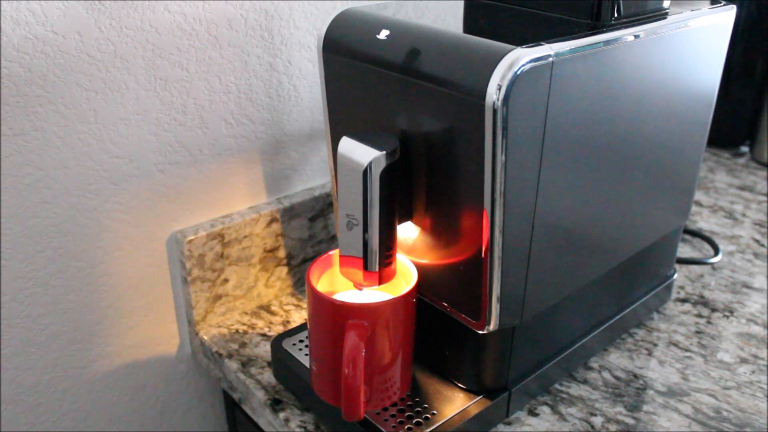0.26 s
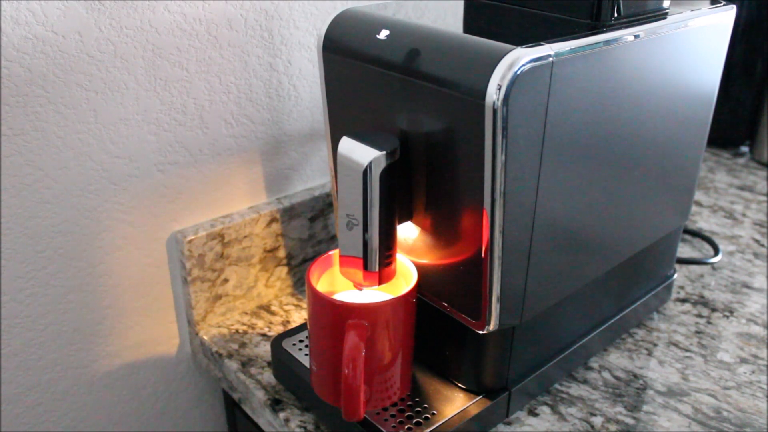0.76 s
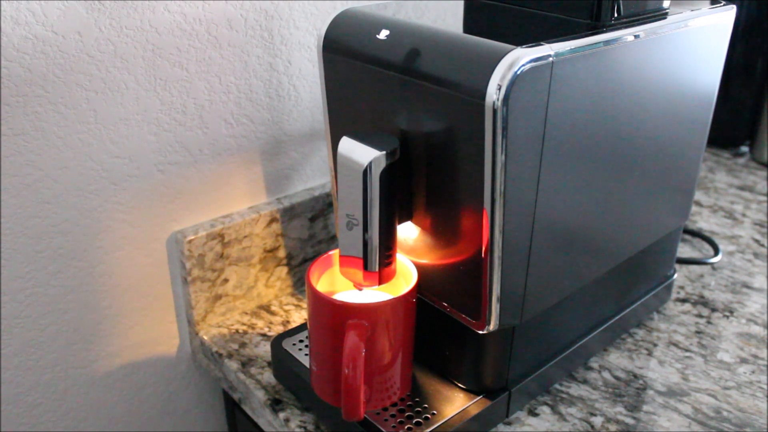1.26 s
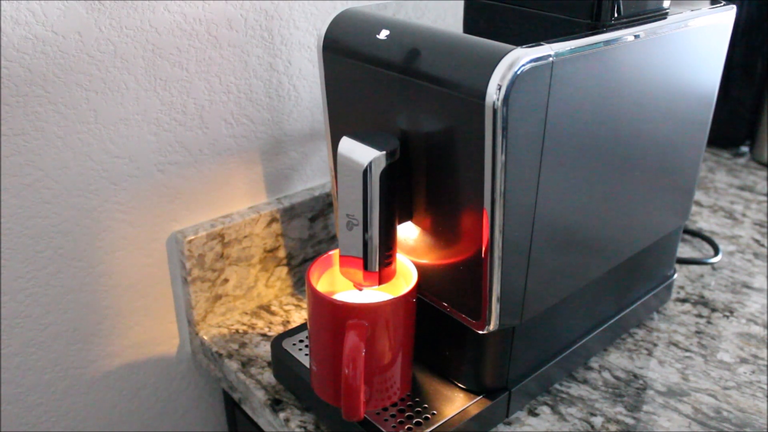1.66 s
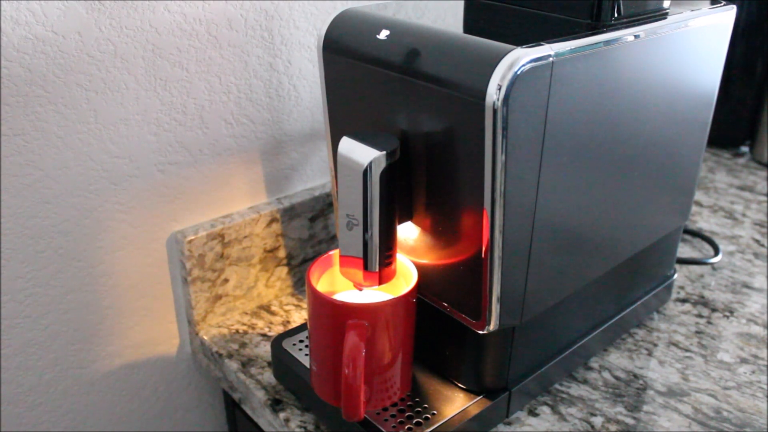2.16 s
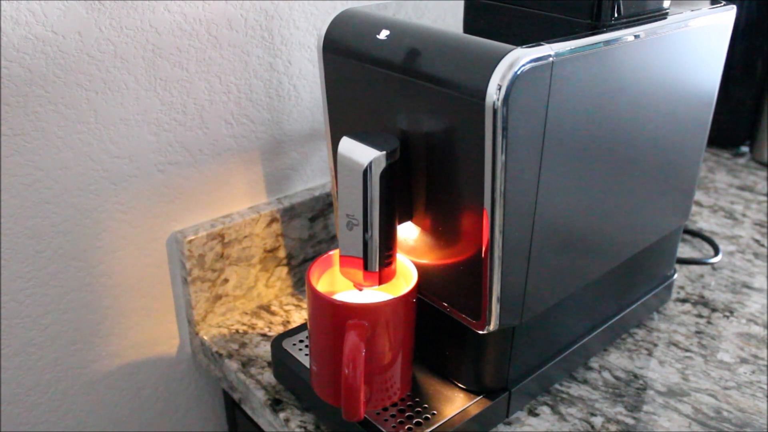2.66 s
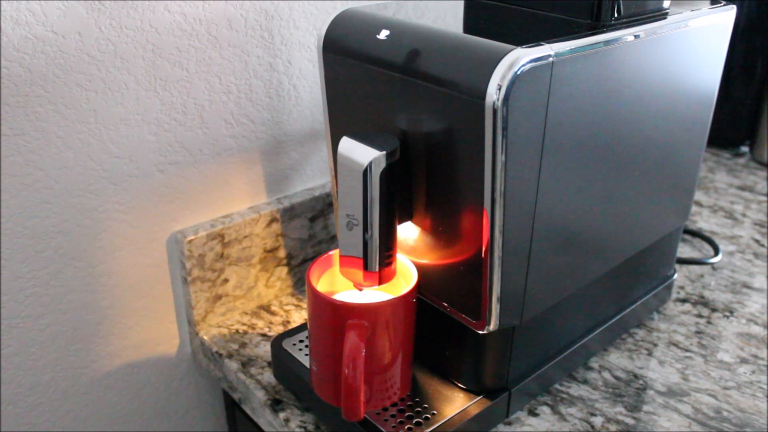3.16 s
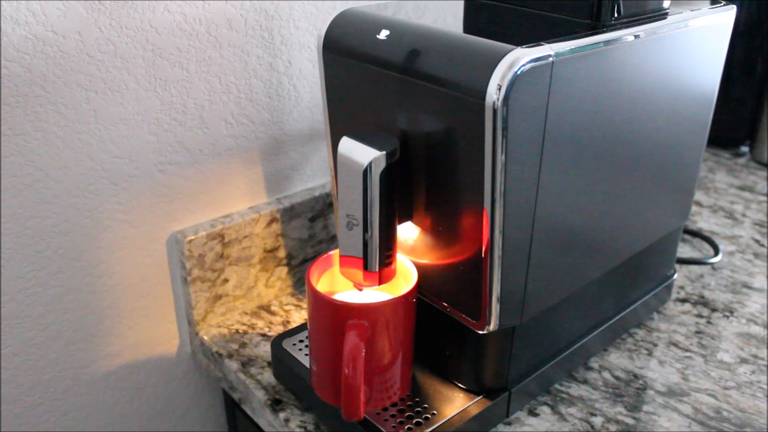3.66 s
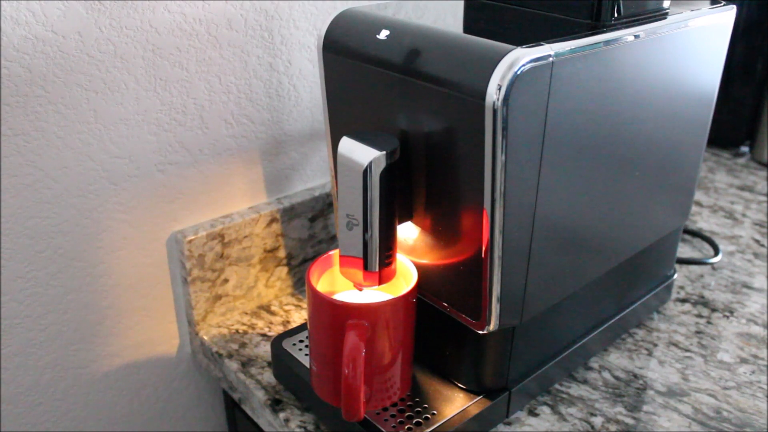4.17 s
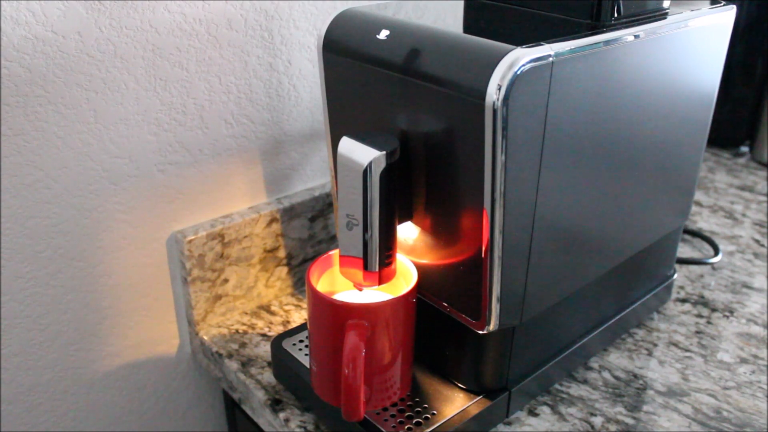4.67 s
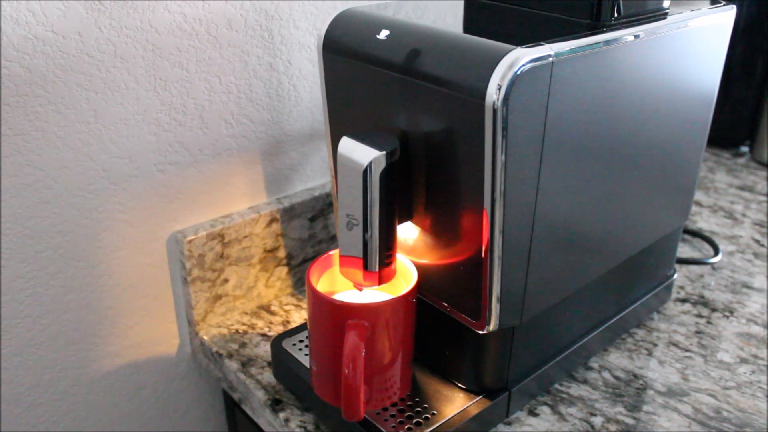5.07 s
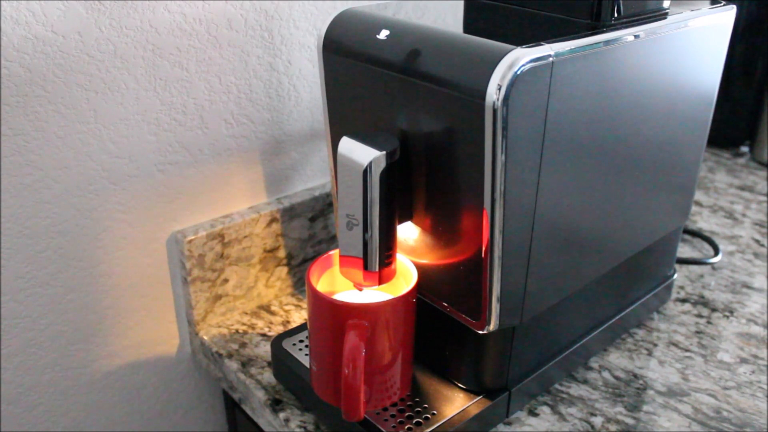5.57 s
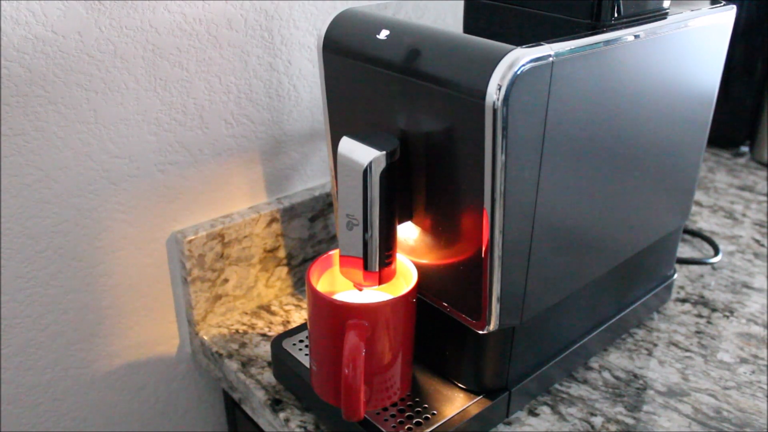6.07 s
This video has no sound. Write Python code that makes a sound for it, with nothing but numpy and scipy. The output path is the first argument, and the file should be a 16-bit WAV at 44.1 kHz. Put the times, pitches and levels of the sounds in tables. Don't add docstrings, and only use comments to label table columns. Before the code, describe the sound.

Over faint hum and hiss, a relay ticks, then a coffee maker's drive clacks, buzzes steadily, stops, pauses and runs again to a final clunk.

```python
import sys
import numpy as np
from scipy import signal
from scipy.io import wavfile
from scipy.ndimage import uniform_filter1d

SR = 44100
rng = np.random.default_rng(int(sys.argv[2]) if len(sys.argv) > 2 else 0)


def voltage_ratio(decibels):
    exponent = np.asarray(decibels, float) / 20
    return 10 ** exponent


def unload_audio(sound):
    columns = np.transpose(np.atleast_2d(sound))
    steps = np.round(np.clip(columns, -1, 1) * 32767)
    wavfile.write(sys.argv[1], SR, steps.astype(np.int16))


N = 279153


def evened(x):
    return x / np.sqrt(np.mean(x ** 2) + 1e-20)


def read(points, hz):
    f, value = np.transpose(points)
    return np.interp(np.log(hz + 1), np.log(f + 1), value)


def add(mix, s, sound):
    part = mix[round(s * SR):][:len(sound)]
    part += sound[:len(part)]


def drift(size, rate):
    span = max(int(SR / rate), 1)
    once = uniform_filter1d(rng.standard_normal(size), span)
    return evened(uniform_filter1d(once, span))


def octaves_from_2k(hz):
    return np.log2((hz + 50) / 2000)


def coloured(x, t, colour_db, tilt, size=1024):
    overlap = size * 3 // 4
    hz, frames, z = signal.stft(x, SR, nperseg=size, noverlap=overlap)
    tilt_db = octaves_from_2k(hz)[:, None] * np.interp(frames, t - t[0], tilt)
    z = z * voltage_ratio(colour_db(hz)[:, None] + tilt_db)
    return signal.istft(z, SR, nperseg=size, noverlap=overlap)[1][:len(x)]


def causal(colour, tilt):
    hz = np.abs(np.fft.fftfreq(2048, 1 / SR))
    gain_db = read(colour, hz) + tilt * octaves_from_2k(hz)
    log_gain = np.log(voltage_ratio(np.maximum(gain_db, -90)))
    return np.fft.ifft(np.exp(np.conj(signal.hilbert(log_gain)))).real[:1024]


def air():
    # f/Hz, level/dB per Hz
    rumble_colour = [(12, -42), (20, -16), (30, -20), (82, -4), (119, -24), (150, 2), (195, 3), (330, -7),
                     (382, 6), (440, -18), (480, 0.5), (620, -6), (2500, -23.5), (4000, -41)]
    hiss_colour = [(500, -8), (2500, -1.5), (6000, -6), (10000, -10.5), (13000, -9), (15800, -9.5)]
    t = np.arange(N) / SR
    swell = -0.15 * drift(N, 6.1)
    rumble = coloured(rng.standard_normal(N), t, lambda f: read(rumble_colour, f), swell)
    hiss = coloured(rng.standard_normal(N), t, lambda f: read(hiss_colour, f), 0 * t)
    return voltage_ratio(-51) * evened(rumble) + voltage_ratio(-62.5) * evened(hiss)


def clatter(length, density):
    t = np.arange(2048) / SR
    struck = rng.random(2048) < density / SR
    hits = rng.choice([-1., 1.], 2048) * rng.uniform(0.55, 1, 2048) * struck
    hits[0] = 1
    build_up = 1 - 0.5 * np.exp(-t / 0.0017)
    return hits * build_up * np.exp(-(t / max(length, 0.001)) ** 3)


def tick(s, db, length):
    # f/Hz, level/dB per Hz
    click_colour = [(470, -21), (800, -9), (1030, -17), (1330, -9), (3710, -10), (4000, -7.5), (4890, -17),
                    (5540, -10), (15800, -31.5)]
    t = np.arange(1024) / SR
    click = causal(click_colour, 0)
    spring = 0.1 * np.abs(click).max() * voltage_ratio(-60 * t / 0.011) * np.sin(2 * np.pi * 5450 * t)
    snap = np.convolve(clatter(length, 9000), click + spring)
    return s, voltage_ratio(db) * snap / np.linalg.norm(snap) * np.sqrt(0.097 * length * SR)


def kitchen(x):
    # f/Hz, t60/s
    decay = [(150, 0.4), (600, 0.7), (2000, 0.65), (5000, 0.54), (10000, 0.34)]
    taps = np.zeros(SR)
    at = np.arange(300, SR - 20, 20)
    taps[at + rng.integers(0, 20, len(at))] = rng.choice([-1., 1.], len(at))
    hz, t, z = signal.stft(taps, SR, nperseg=256)
    fade = voltage_ratio(-60 * t / read(decay, hz)[:, None])
    tail = signal.istft(z * fade, SR, nperseg=256)[1]
    return signal.fftconvolve(x, tail / np.linalg.norm(tail))[:N]


def motor(rows, mesh, surges, bright, orders, shell, panels, coast):
    s, *columns = np.transpose(rows)
    t = np.arange(s[0], s[-1] + coast, 1 / SR)
    hz, fifth_db, rattle_db = (np.interp(t, s, c) for c in columns)
    surge_half_s = 0.03502
    surge_db = sum(db * np.exp(-((t - at) / surge_half_s) ** 2) for at, db in surges)
    off = np.maximum(t - s[-1], 0)

    tilt = bright[0] + bright[1] * (rattle_db - np.median(rattle_db))
    tilt = tilt - 5 * np.exp((t[0] - t) / 0.077) - 150 * off

    coast_db = -450 * off
    fifth_db = fifth_db - 0.2 * surge_db + coast_db
    rattle_db = rattle_db + coast_db

    levels = [(5, fifth_db)]
    for k, db, best_hz, loss, share in mesh:
        levels.append((k, rattle_db + db - loss * np.abs(hz - best_hz) + share * surge_db))
    hz = hz + 0.06 * surge_db
    turn = 2 * np.pi * np.cumsum(hz * (1 + 0.0006 * drift(len(t), 40))) / SR
    free_db = -1.5 * np.clip(hz - 121, 0, 5)
    levels += [(k, db + rattle_db + free_db) for k, db in orders]
    tones = np.zeros(len(t))
    for k, db in levels:
        wobble_db = 1.44 * drift(len(t), 30)
        tones += voltage_ratio(db + wobble_db) * np.sin(k * turn + 2 * np.pi * rng.random())

    beat = 1 + 0.14 * np.cos(turn) + 0.074 * np.cos(4 * turn)
    teeth = rng.standard_normal(len(t)) * beat * voltage_ratio(1.12 * drift(len(t), 92))

    def housing_db(f):
        rings = sum(db / (1 + (2 * (f - centre) / width) ** 2) for centre, width, db in panels)
        return read(shell, f) + rings

    rattle = evened(coloured(teeth, t, housing_db, np.clip(tilt, -4, 4), size=2048))
    edges = np.clip(np.minimum((t - t[0]) / 0.027, (t[-1] - t) / 0.01), 0, 1)
    return s[0], edges * np.sqrt(2) * tones, edges * voltage_ratio(rattle_db + 1.0) * rattle


def first_run():
    # t/s, shaft speed/Hz, whine of the 5th order/dB, gear rattle/dB
    drive = [
        (1.072, 101, -50, -36),
        (1.20, 119, -39, -43),
        (1.28, 110.4, -37, -39.5),
        (1.39, 114.9, -30.5, -38.5),
        (2.24, 115.7, -30.5, -37.5),
        (2.49, 118.7, -34, -35.5),
        (2.80, 119.8, -28.5, -34.5),
        (2.865, 115.7, -33.5, -38),
        (2.93, 114.9, -36, -36.5),
    ]
    # shaft multiple, level over rattle/dB, best speed/Hz, loss/dB per Hz away, surge share
    mesh = [(9, -0.5, 114.8, 3, .1), (10, -7.5, 117, 0.3, 0.97), (11, -11, 115, 2.2, .1)]
    # t/s, level/dB
    surges = [(1.37, 5), (1.49, 9), (1.61, 10), (1.82, 9), (1.96, 5), (2.14, 6), (2.25, 7), (2.67, 6),
              (2.81, 5), (2.89, 6)]
    # tilt/dB per octave, change per dB of rattle above its usual level
    bright = (.9, -0.3)
    # shaft multiple, level over rattle/dB
    orders = [(2, -16), (3, -23), (4, -20), (7, -29), (8, -16), (9.5, -13.5), (13, -14.5), (18, -16.5),
              (23, -14.5), (25, -17), (28, -16), (30, -16), (90, -42)]
    # f/Hz, level/dB per Hz
    shell = [(70, -79), (130, -44), (230, -21.5), (500, -18), (1130, -14), (1600, -20.5), (2900, -25.5),
             (3150, -19), (4190, -23), (4930, -37), (6180, -35), (7700, -42), (8500, -47.5), (15800, -57)]
    # f/Hz, width/Hz, level over housing/dB
    panels = [(537.53, 58, 6.5), (760, 77, 4), (1300, 46.5, 4.5), (1380, 48.4, 2.5), (1804, 77, 9),
              (2040, 60, 7), (2438, 106, 15), (3060, 83, 7.5), (3330, 87.9, 2), (4130, 150, 4),
              (5320, 35, 13), (5940, 139.3, 9.5), (6260.1, 180, 11), (6470, 43, 7), (6820, 67, 18.5),
              (7370, 370, 13), (7870, 94, 13.5), (10285, 80, 9)]
    return motor(drive, mesh, surges, bright, orders, shell, panels, coast=0.064)


def knock(s, db, low_hz, high_hz, tilt):
    # f/Hz, level/dB, t60/s
    body = [(230, -12.5, 0.053), (380, 1, 0.088), (560, 2, 0.054), (990, -11, 0.045), (1430, -25, 0.015),
            (1680, -34, 0.034), (2240, -30, 0.04585), (3318, -37, .03)]
    # f/Hz, level/dB per Hz
    snap_colour = [(60, -34), (150, -12.5), (440, -5), (700, 0), (1330, -6.5), (1860, -6), (2670, -14),
                   (4620, -17), (6500, -28), (8370, -32.5), (15800, -54)]
    t = np.arange(4096) / SR
    length = 0.015 + 0.00015 * db

    modes = body + [(low_hz, 2.5, 0.045), (high_hz, -3.5, 0.05)]
    ring = sum(voltage_ratio(level - 60 * t / t60) * np.cos(2 * np.pi * f * t) for f, level, t60 in modes)
    ring = signal.lfilter(*signal.butter(2, 3500, fs=SR), ring)
    ring = ring / np.linalg.norm(ring) * 0.5 * voltage_ratio(min(-3.0 * tilt, 12))

    snap = np.pad(causal(snap_colour, tilt), (0, 3072))
    snap = snap / np.linalg.norm(snap)
    dull = signal.lfilter([0.5, 0.5], [1], snap)
    dull = signal.lfilter(*signal.butter(2, 2500, fs=SR), dull)

    hits = clatter(length, 6000)
    force = np.linalg.norm(hits)
    sharp = 1.3 * hits * np.exp(-t[:2048] / (0.4 * length))
    blow = np.convolve(hits, 0.5 * ring + dull) + np.convolve(sharp, snap - dull)
    blow[:4096] += 2.3 * force * ring * (1 - np.exp(-(t / 0.0039) ** 2))
    far = np.pad(1.8 * ring + 0.5 * (snap + dull), (0, 2047)) * force
    low_cut = signal.butter(3, 150, "high", fs=SR, output="sos")
    both = signal.sosfilt(low_cut, [blow, far])
    return s, voltage_ratio(db) * both / np.abs(both[0]).max()


def thump(s, db, hz, t60):
    t = np.arange(SR // 3) / SR
    turn = 2 * np.pi * np.cumsum(hz * (1 + 0.1 * drift(len(t), 60))) / SR
    return s, voltage_ratio(db - 60 * t / t60) * np.sin(turn) * (1 - np.exp(-t / 0.0051))


def groan(s, length, db, from_hz, to_hz):
    size = int(length * SR)
    turn = 2 * np.pi * np.cumsum(np.linspace(from_hz, to_hz, size)) / SR
    rough = voltage_ratio(1.5 * drift(4096, 250)[np.arange(size) % 4096])
    return s, voltage_ratio(db) * np.sin(turn) * rough * signal.windows.tukey(size, 0.7)


def second_run():
    # t/s, shaft speed/Hz, whine of the 5th order/dB, gear rattle/dB
    drive = [
        (4.16, 110, -55, -33.5),
        (4.25, 118, -36.5, -37),
        (4.33, 124.5, -30.5, -34.5),
        (4.415, 123.2, -34.5, -32),
        (4.49, 127, -58, -32.5),
        (4.59, 124.3, -32.5, -33.5),
        (4.72, 119.3, -35, -36.5),
        (6.09, 120.3, -34.5, -36),
        (6.23, 116, -34.5, -36),
    ]
    # shaft multiple, level over rattle/dB, best speed/Hz, loss/dB per Hz away, surge share
    mesh = [(4, -6.5, 119.7, 2.5, -0.44), (9, -10.5, 121, 0.95, 1.0), (10, -9.5, 121, 1.1, 0.86),
            (20, -12, 120.5, 1.5, 0.45)]
    # t/s, level/dB
    surges = [(4.55, 6.94), (4.65, 8), (4.82, 5.9), (5.08, 4), (5.23, 5.9), (5.37, 11.1), (5.51, 12.1),
              (5.64, 6.9), (5.82, 5), (5.99, 8), (6.1, 11.2)]
    # tilt/dB per octave, change per dB of rattle above its usual level
    bright = (.1, -0.17)
    # shaft multiple, level over rattle/dB
    orders = [(2, -33), (3, -17.5), (6, -16), (7, -13.5), (7.5, -32), (11, -16.5), (13, -13.5), (15, -15),
              (17, -28.5), (26, -18), (27, -15), (34, -18)]
    # f/Hz, level/dB per Hz
    shell = [(70, -67.5), (130, -35), (420, -14), (670, -14.5), (1070, -9), (1390, -14.5), (3210, -17.5),
             (4190, -17), (4930, -29), (6570, -27.5), (7800, -30.5), (8500, -37), (10300, -43),
             (15800, -47.5)]
    # f/Hz, width/Hz, level over housing/dB
    panels = [(370, 120, 3.3), (615.5, 39, 12.7), (790, 45, 4), (1310, 31, 2.9), (1594, 240, 5.9),
              (1805, 53.9, 3.9), (2054, 96, 5.4), (2520, 26, 7.4), (3220, 530, 6.9), (4280, 200, 5.2),
              (5680, 124.2, 5.544), (6270, 64.45, 10.4), (6635, 78, 12.4), (7360, 170, 7),
              (8900, 98.6, 2.9), (9406, 50.4, 6), (11410, 200, 3.27), (13600, 200, 4), (15530, 250, 11.33)]
    return motor(drive, mesh, surges, bright, orders, shell, panels, coast=0.03)


def scene():
    # t/s, peak level/dB, bounce length/s
    ticks = [
        (0.555, -31, 0.01),
        (1.0703, -34, 0.0083),
        (2.89, -31, .004),
        (2.928, -30, 0.0059),
        (4.158, -35, 0.0074),
        (4.2207, -21.5, 0.017),
        (6.216, -33, 0.0059),
        (6.26, -30, .008),
    ]
    # t/s, peak level/dB, low ring/Hz, high ring/Hz, brightness/dB per octave
    knocks = [
        (1.1205, -6, 446, 1570, 0.27),
        (1.198, -46, 606, 2430, .1),
        (2.9778, -9, 749, 1720, 0.4),
        (3.026, -31, 770, 1700, -1),
        (3.439, -49, 590.5, 1310, -9),
        (4.2211, -14, 385, 990, 4.5),
        (4.274, -20.5, 560, 1090, -1.5),
        (4.602, -19.5, 370, 1100, 0.5),
        (6.239, -7, 595, 1502, 0.4),
    ]
    # t/s, peak level/dB, f/Hz, t60/s
    thumps = [
        (1.126, -40.5, 80.4, 0.14),
        (2.881, -41, 84.5, 0.14),
        (2.98, -46, 70.88, 0.21),
        (4.192, -34.5, 75, 0.15),
        (4.52, -47, 69.4, .2),
        (4.599, -41, 80, 0.23),
        (6.24, -39, 75, 0.1615),
    ]
    # t/s, length/s, peak level/dB, from f/Hz, to f/Hz
    groans = [(1.135, 0.058, -33, 569, 585), (4.178, 0.036, -27.5, 205, 218), (4.182, 0.02, -22, 423, 400),
              (4.205, 0.028, -30, 217, 186), (4.215, 0.021, -36, 396, 380), (4.275, 0.033, -30, 542, 522),
              (4.435, 0.039, -34, 762, 760), (4.47, .035, -34, 760, 754), (4.493, 0.043, -31.5, 735, 687),
              (4.593, 0.078, -39, 380, 356), (4.6, 0.025, -37.5, 234, 230), (4.606, 0.032, -35, 707, 710)]
    tones, rattle, hits, near, far = np.zeros((5, N))
    for s, tone, noise in (first_run(), second_run()):
        add(tones, s, tone)
        add(rattle, s, noise)
    for make, table in ((tick, ticks), (thump, thumps), (groan, groans)):
        for row in table:
            add(hits, *make(*row))
    for row in knocks:
        s, blow = knock(*row)
        add(near, s, blow[0])
        add(far, s, blow[1])
    send = voltage_ratio(-20) * tones + voltage_ratio(-11.5) * rattle + voltage_ratio(-7) * hits + voltage_ratio(-8) * far
    return (tones + rattle + hits + near + kitchen(send) + air())[None]


def top_cut(x):
    return signal.sosfilt(signal.butter(12, 16500, fs=SR, output="sos"), x)


def record(dry):
    # t/s, length/s, above f/Hz, loss/dB
    dropouts = [(1.826, .012, 7800, -14), (2.071, .03, 7600, -49), (2.071, .02, 4900, -10),
                (2.127, 0.0093, 7800, -19), (2.656, 0.014, 7300, -15), (2.721, 0.016, 7200, -18),
                (3.106, .016, 5600, -16), (4.556, 0.01822, 7500, -14), (6.05, 0.016, 7200, -14)]
    hz, t, z = signal.stft(dry, SR, nperseg=256)
    loss_db = 0
    for s, length, edge_hz, db in dropouts:
        loss_db = loss_db + db * np.outer(hz > edge_hz, np.exp(-(2 * (t - s) / length) ** 4))
    x = signal.istft(z * voltage_ratio(loss_db), SR, nperseg=256)[1][:, :N]
    band_limit = signal.firwin(1023, 15830, window=("kaiser", 9), fs=SR)
    mix = signal.oaconvolve(x, band_limit[None], "same")
    return top_cut(mix)


dry = scene()
out = record(dry)
unload_audio(out)
```